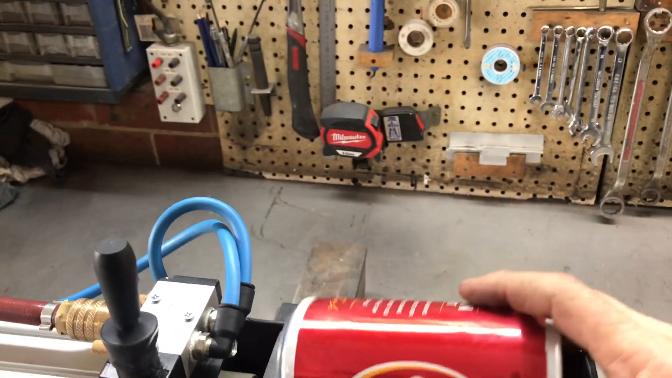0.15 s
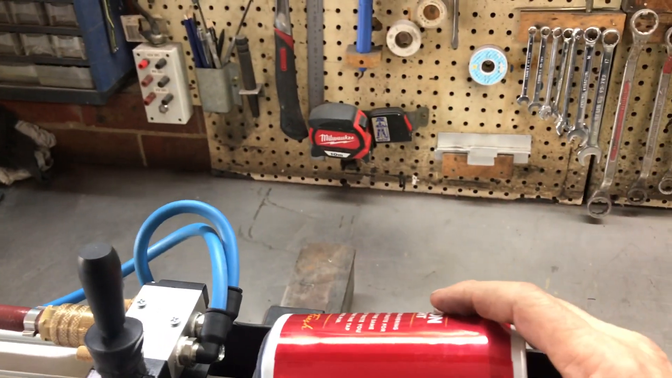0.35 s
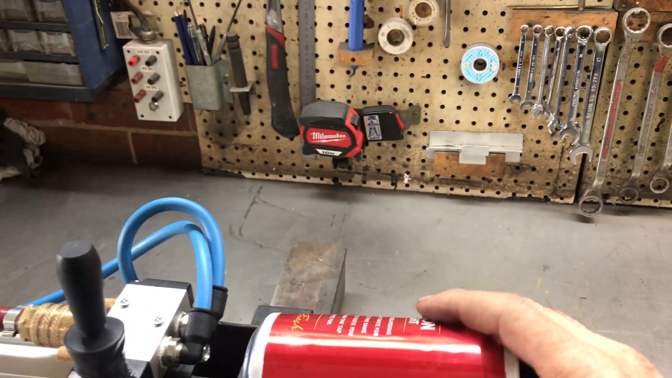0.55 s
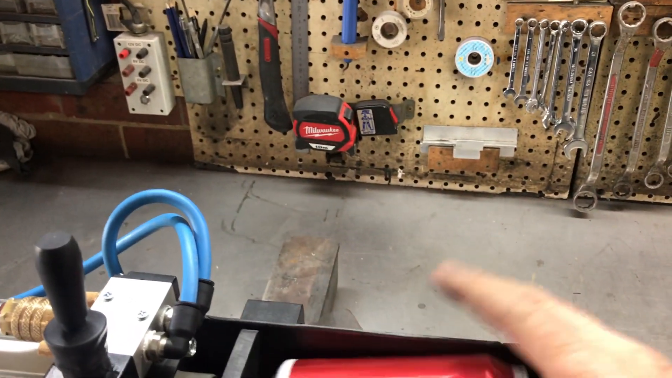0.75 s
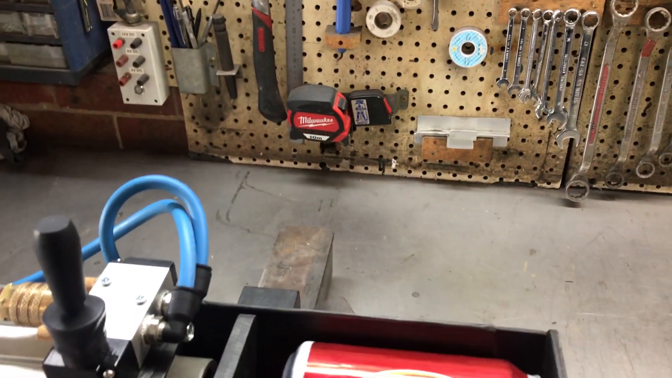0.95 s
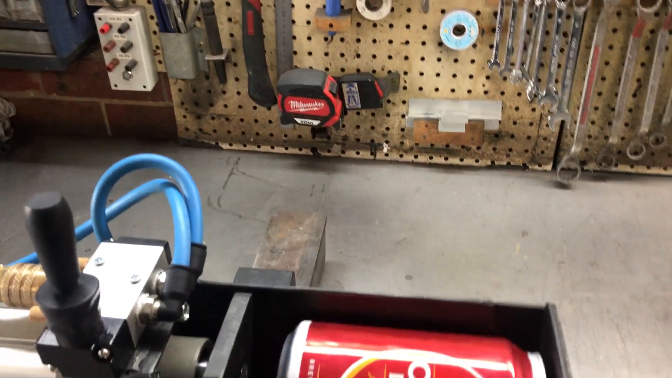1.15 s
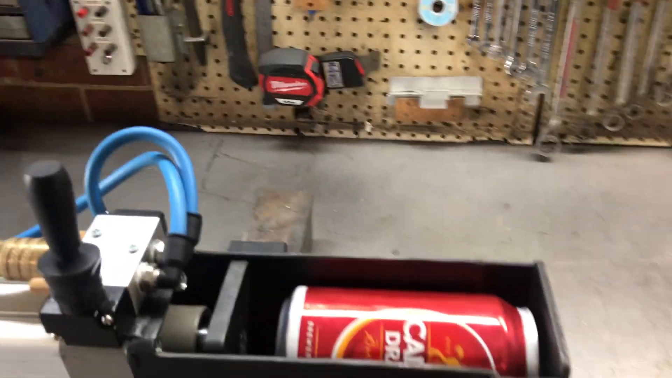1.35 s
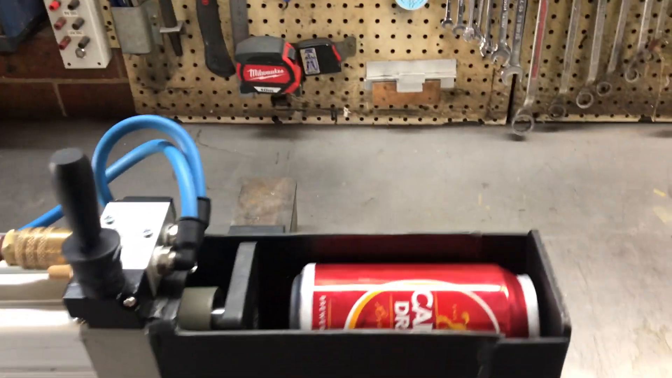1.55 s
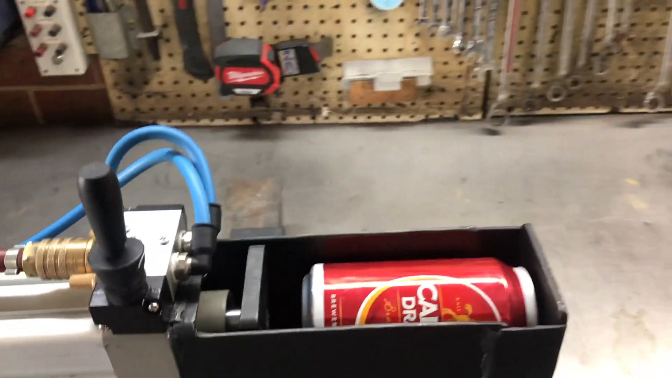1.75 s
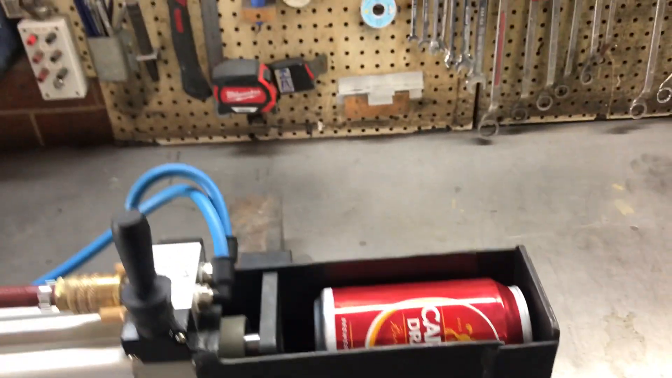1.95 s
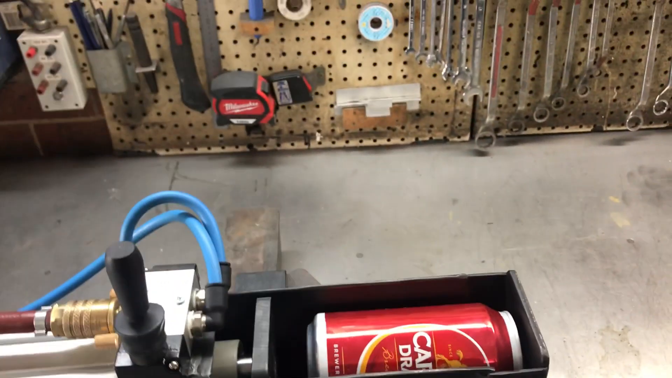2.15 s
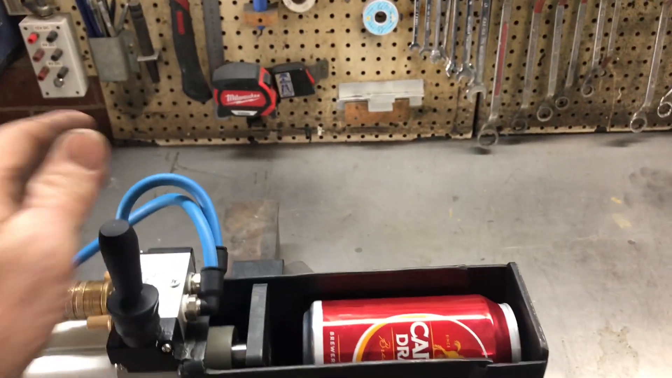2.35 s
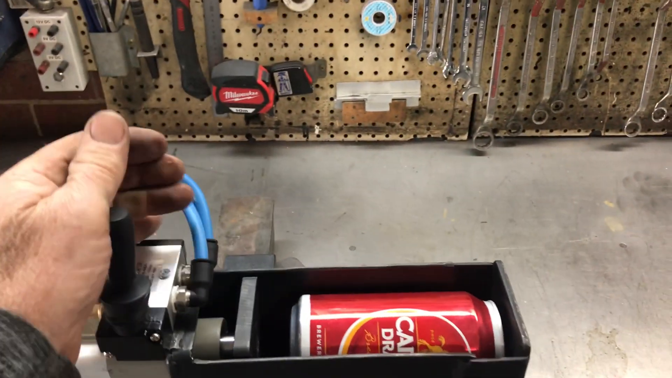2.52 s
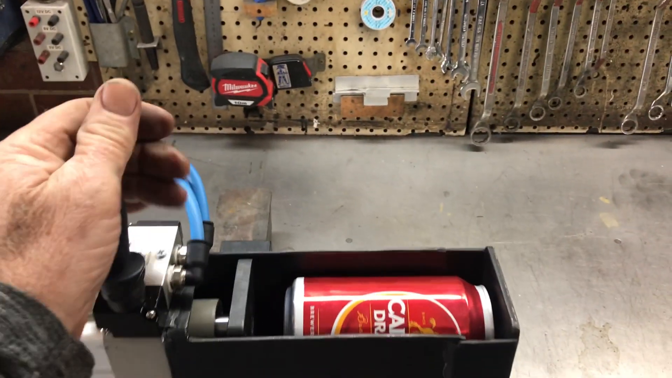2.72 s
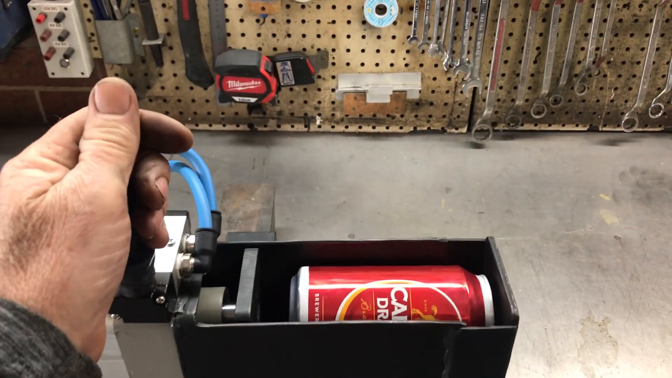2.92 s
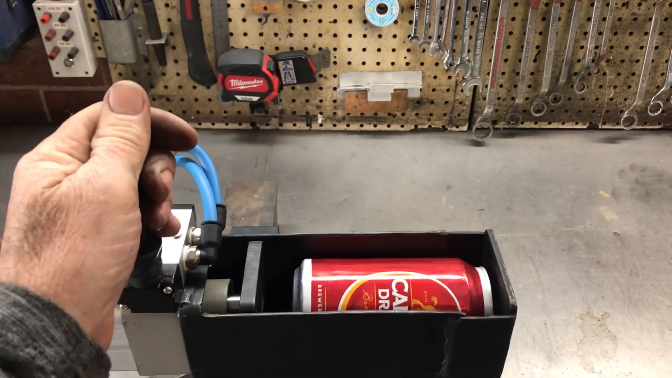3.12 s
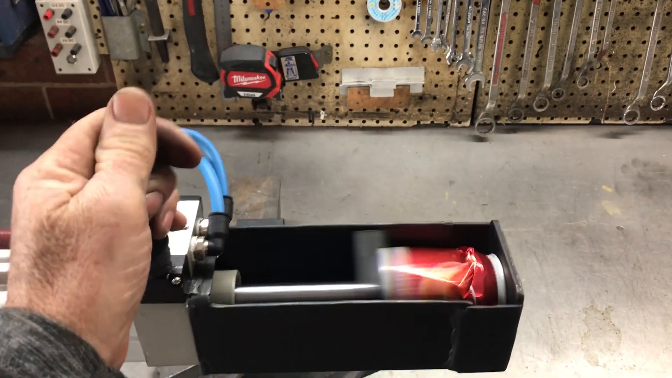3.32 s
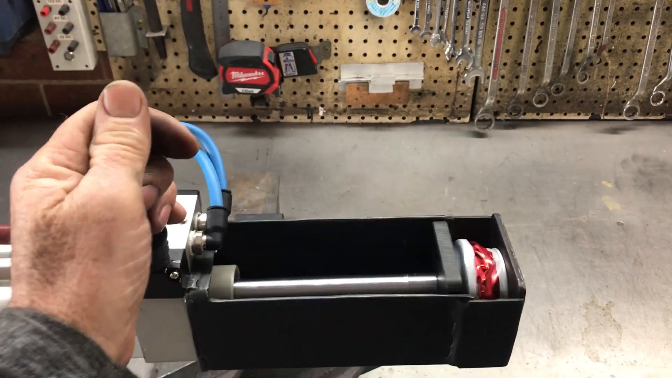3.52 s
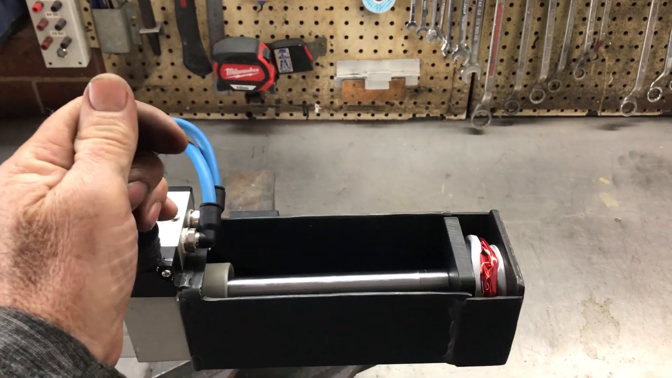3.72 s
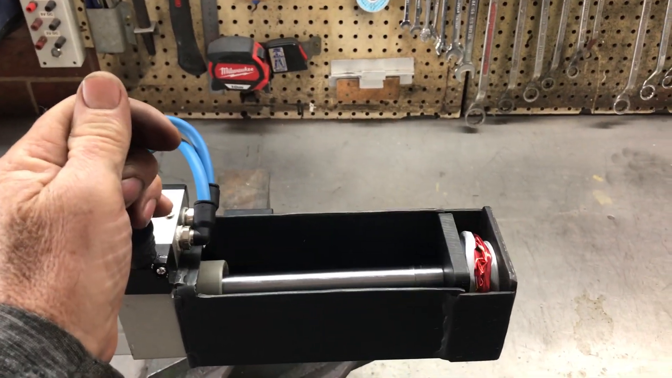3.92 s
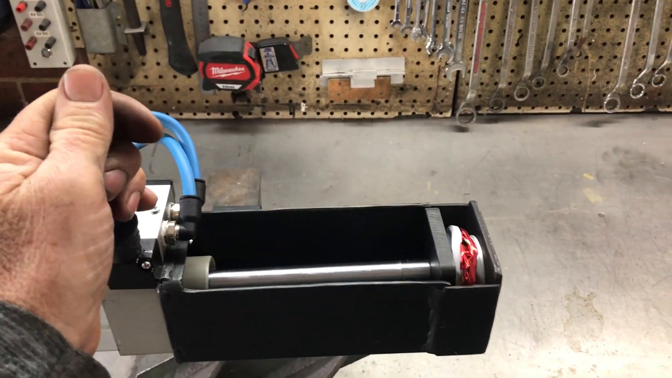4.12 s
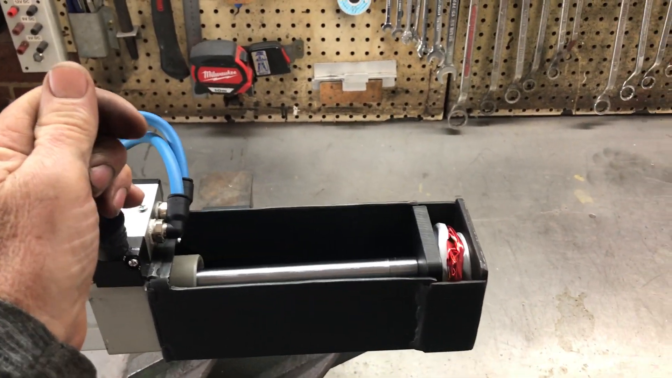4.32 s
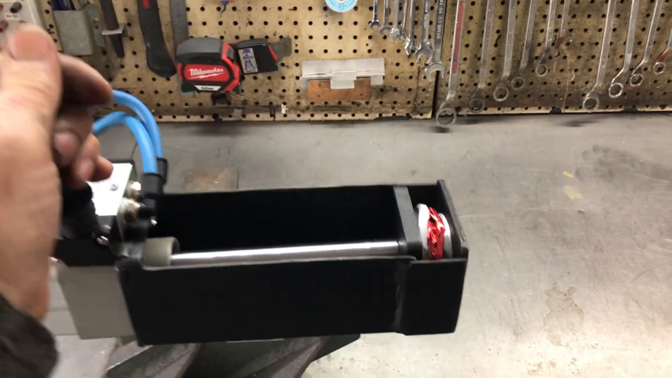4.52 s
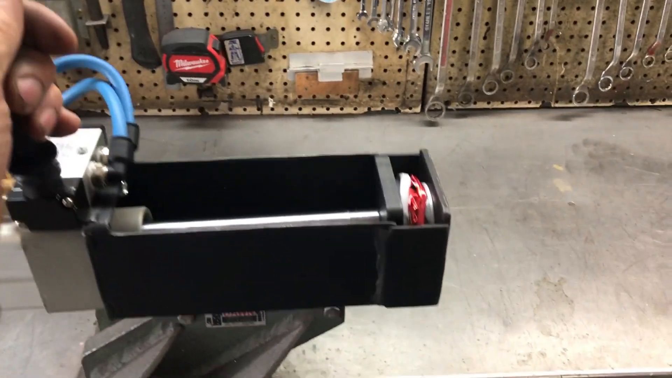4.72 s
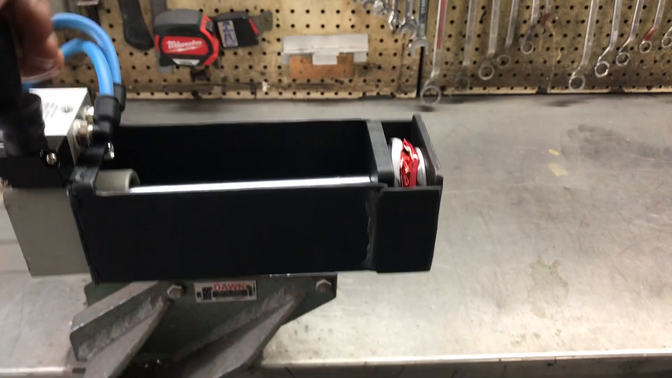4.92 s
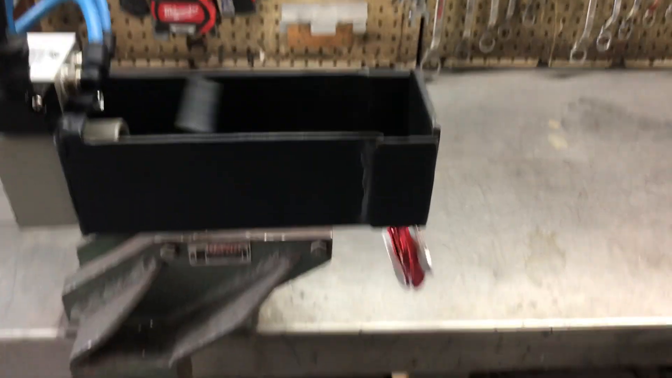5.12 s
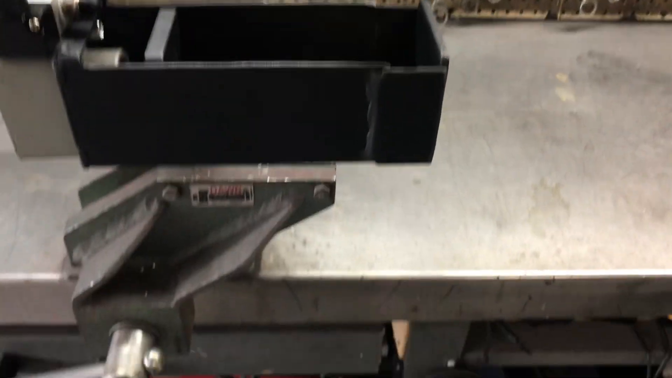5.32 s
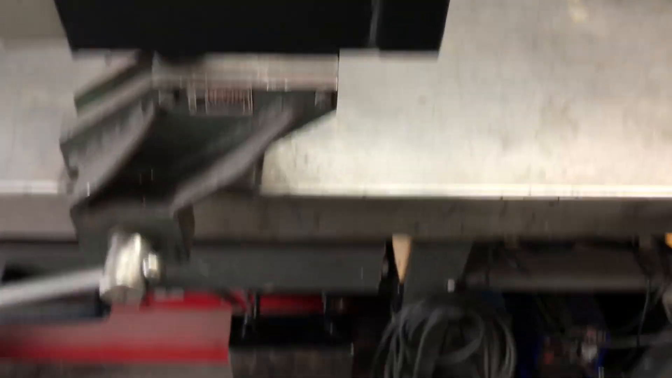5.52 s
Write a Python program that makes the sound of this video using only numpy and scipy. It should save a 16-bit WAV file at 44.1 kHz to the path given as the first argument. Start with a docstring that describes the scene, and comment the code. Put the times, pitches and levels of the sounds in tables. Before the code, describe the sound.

Close up in a small, lightly echoing workshop, an empty aluminium can knocks and clatters into a steel chute. After a near-silent pause, compressed air bursts out as the can crumples in a fraction of a second with snaps, thuds and a hard tick. A little air bleeds off, then quiet. A second, louder blast drives the ram back, followed by a whistling hiss and the flattened can landing lightly below.

```python
"""On a workshop bench, an empty aluminium can is knocked into the steel chute of an air-driven crusher.
Knocks make the can chatter and ring; light touches rustle, and sliding is a crowd of tiny clicks.
The valve opens with a blast of coloured noise, the can buckles in snaps and crackles, and ticks follow.
A second blast draws the ram rumbling back, and the flattened can drops out and lands below.
After each blast air bleeds out with a hiss and a whistle; thuds, echoes and a quiet room surround it all."""
import sys
import numpy as np
from scipy import signal
from scipy.fft import rfft, irfft, next_fast_len
from scipy.io import wavfile

SR = 44100
rng = np.random.default_rng(int(sys.argv[2]) if len(sys.argv) > 2 else 0)


def dump_mix(stems):
    """Bounce the given channels to the path in sys.argv[1] as a 16-bit WAV at rate SR."""
    frames = np.atleast_2d(stems).T  # one column per channel
    limited = np.clip(frames, -1, 1)  # hard clip at full scale
    pcm = np.round(limited * 32767).astype(np.int16)
    wavfile.write(sys.argv[1], SR, pcm)


N = 249606
TIME = np.arange(N) / SR
HIT_TIME = TIME[:SR // 2]  # every short sound gets half a second


def amp(db):
    """Turns decibels into gain."""
    return 10 ** (np.asarray(db) / 20)


def unit(x):
    """Scales a signal to rms 1."""
    return x / np.sqrt(np.mean(x ** 2) + 1e-20)


def read(points, hz):
    """Reads a curve between its points on a log-frequency axis."""
    f, value = np.transpose(points)
    return np.interp(np.log(hz + 1), np.log(f + 1), value)


def swell(rows, rise_s, fade_s):
    """Gain over time from (start s, length s, dB) rows: each rises, holds and dies away."""
    total = 0
    for start, length, db in rows:
        rise = np.clip((TIME - start) / rise_s, 0, 1)
        fade = np.exp(-np.maximum(TIME - start - length, 0) / fade_s)
        total = total + amp(db) * rise * fade
    return total


def add(mix, s, sound):
    """Mixes a sound in at time s, cutting off what runs past the end."""
    part = mix[round(s * SR):][:len(sound)]
    part += sound[:len(part)]


def band(x, lo_hz, hi_hz, order=3):
    """Keeps only the pitches between two frequencies."""
    edges = [lo_hz, min(hi_hz, SR / 2 - 1)]
    return signal.sosfilt(signal.butter(order, edges, "band", fs=SR, output="sos"), x)


def tint(x, colour):
    """Shapes a signal's spectrum by a colour curve, at rms 1."""
    size = next_fast_len(N)
    gain = amp(read(colour, np.fft.rfftfreq(size, 1 / SR)))
    return unit(irfft(rfft(x, size) * gain, size)[:N])


def noise(colour):
    """Steady noise of rms 1 with the given spectrum."""
    return tint(rng.standard_normal(N), colour)


def resonate(x, hz, width):
    """A resonance of gain 1: shift its pitch down to zero, smooth, and shift back."""
    turn = np.exp(2j * np.pi * np.cumsum(hz * np.ones(N)) / SR)
    r = np.exp(-np.pi * width / SR)
    return 2 * (turn * signal.lfilter([1 - r], [1, -r], x / turn)).real


def ring(modes):
    """A struck object sounds as a sum of dying sines, one per mode, with alternating signs."""
    total = 0
    for k, (hz, db, t60) in enumerate(modes):
        decay = amp(db - 60 * HIT_TIME / t60)
        total = total + (-1) ** k * decay * np.sin(2 * np.pi * hz * HIT_TIME)
    return total


def grains(per_s, spread_db):
    """Random tiny clicks, a few much larger than the rest."""
    size = amp(abs(spread_db) * np.minimum(rng.exponential(1, N), 4))
    sign = rng.choice([-1, 1], N)
    return unit(size * sign * (rng.random(N) < per_s / SR))


# colour of the steady background noise: [f/Hz, level/dB]
BACKGROUND_COLOUR = [(120, -30), (200, 3.5), (482, -7), (1210, -1.5), (1870, -9.5), (2250, -12),
                     (3020, -17), (3430, -14.5), (4040, -20), (6520, -20), (7680, -26.5), (15100, -24.5),
                     (16000, -36.5)]
# colour of the low rumble under it: [f/Hz, level/dB]
RUMBLE_COLOUR = [(13, -62.5), (22, -23.5), (76, 4.5), (97, -1.5), (105, -8.5), (108, -12.5), (145, -15),
                 (194, -16), (220, -29.5), (290, -45), (480, -120)]
BACKGROUND_DB, RUMBLE_DB = -64.5, -57.5


def background():
    """The quiet room is steady noise over a low rumble."""
    return amp(BACKGROUND_DB) * noise(BACKGROUND_COLOUR) + amp(RUMBLE_DB) * noise(RUMBLE_COLOUR)


# how long the room's echo takes to fall by 60 dB: [f/Hz, t/s]
ROOM_DECAY = [(200, 0.62), (1000, .52), (4000, 0.64), (9000, 0.31), (16000, 0.5)]


def workshop(x):
    """Dense reflections from bench and walls, the top treble dying sooner than the rest."""
    taps = rng.choice([-1., 1.], SR) * (rng.random(SR) < 3000 / SR)
    taps = taps * (TIME[:SR] > .004)  # the first 4 ms stay empty
    hz, t, z = signal.stft(taps, SR, nperseg=256)
    fading = z * amp(-60 * t / read(ROOM_DECAY, hz)[:, None])
    tail = signal.istft(fading, SR, nperseg=256)[1]
    return signal.fftconvolve(x, tail / np.linalg.norm(tail))[:N]


# echoes from the chute walls, bench top and tool board: [delay t/s, level/dB before echo_db]
NEAR_ECHOES = [(.0011, -17), (.0023, -14.5), (.0037, -16), (.0052, -13), (.0071, -13), (.0094, -14.5),
               (.0128, -13)]


def nearby(x, echo_db):
    """Close hard surfaces comb the sound; scaling the taps keeps it from growing louder."""
    taps = np.zeros(SR // 20)
    taps[0] = 1
    for k, (s, db) in enumerate(NEAR_ECHOES):
        taps[round(s * SR)] += (-1) ** k * amp(db + echo_db)
    return signal.oaconvolve(x, taps / np.linalg.norm(taps))[:N]


# dull thuds through the frame and bench: [t/s, level/dB, f/Hz]
BENCH_THUDS = [(.832, -40, 140), (1.03, -47, 160), (3.352, -25.5, 61), (3.356, -26.5, 175),
               (3.36, -36, 420), (3.525, -36.5, 113), (3.632, -36, 99), (3.635, -44, 280), (3.78, -29, 116),
               (3.824, -38, 89)]


def frame(thud_s, shudder_db, shudder_s):
    """The bench thuds briefly, and the frame shudders on after each thud."""
    out, t = np.zeros(N), HIT_TIME
    for s, db, hz in BENCH_THUDS:
        thud = t / thud_s * np.exp(1 - t / thud_s) * np.sin(2 * np.pi * hz * t)
        shake = unit(band(rng.standard_normal(len(t)), 84, 170))
        shudder = amp(shudder_db) * np.exp(-t / shudder_s) * shake
        add(out, s, amp(db) * (thud + shudder))
    return out


# a thin hiss as the hand takes the lever: [start t/s, length t/s, level/dB]
HISS_TIMES = [(2.43, .2, -72.5)]
# the valve sings faintly as its lever is eased back: [start t/s, length t/s, level/dB]
SINGING_TIMES = [(4.12, .1, -67), (4.52, .12, -60)]
# pitches in that singing: [f/Hz, width f/Hz, level/dB]
SINGING_MODES = [(1380, 45, -2), (1760, 30, 0), (1920, 40, -3), (2460, 60, -10), (3530, 50, -9),
                 (4680, 300, -9)]


def lever(hiss_hz):
    """Air seeps through the valve as its lever is handled: a thin hiss, later a faint singing."""
    seep = rng.standard_normal(N)
    singing = 0
    for hz, width, db in SINGING_MODES:
        singing = singing + amp(db) * unit(band(seep, hz - width / 2, hz + width / 2, order=1))
    hiss = unit(band(seep, hiss_hz / 1.06, hiss_hz * 1.06, order=2))
    sung = swell(SINGING_TIMES, rise_s=.06, fade_s=.06) * unit(singing)
    return sung + swell(HISS_TIMES, rise_s=.04, fade_s=.05) * hiss


# soft touches on the can and the valve lever: [t/s, level/dB, length t/s]
LIGHT_TOUCHES = [(0.26, -45, .006), (0.272, -45, .005), (0.304, -44, .009), (1.265, -53, 0.013),
                 (1.866, -60.5, 0.0053), (1.935, -67, .05), (2.166, -56, 0.05), (2.556, -51, .012)]
TOUCH_HZ = 3300


def touches():
    """A hand on metal makes soft taps of fading, rustling noise."""
    out, t = np.zeros(N), HIT_TIME
    for s, db, length in LIGHT_TOUCHES:
        rustle = unit(band(rng.standard_normal(len(t)), TOUCH_HZ / 1.6, TOUCH_HZ * 1.1, order=1))
        add(out, s, amp(db) * rustle * np.exp(-t / length))
    return out


# bright ticks of the valve spool and of metal settling under load:
# [t/s, level/dB, brightness f/Hz, length t/s, steel ring level/dB]
METAL_TICKS = [(3.272, -23.5, 5000, 0.0017, -39), (3.474, -19, 7940, 0.00078, -23),
               (3.624, -10.5, 4170, 0.00055, -25), (3.7608, -25.5, 14000, 0.00047, -43),
               (4.3128, -24.5, 13130, 0.00065, -33), (5.0036, -26, 4940, 0.0012, -32.5)]
# the chute struck end-on: [f/Hz, level/dB, time to fall 60 dB t/s]
CHUTE_END_MODES = [(621, -24, 0.5), (1243, -2.5, 0.43), (2420, -4, .15), (4000, -8, 0.27), (5227, -10, .25)]


def ticks(tail_db, tail_s, body_db):
    """A sudden slip gives a bright crack, a short shimmer and a faint ring of the chute."""
    out, t = np.zeros(N), HIT_TIME
    chute = ring(CHUTE_END_MODES)
    for s, db, hz, length, steel_db in METAL_TICKS:
        slip = rng.standard_normal(len(t))
        bright = unit(band(slip, hz / 1.5, hz * 1.4, order=1))
        crack = bright + amp(body_db) * unit(band(slip, 1200, 6000, order=2))
        first = np.exp(-t / length) / np.std(crack[:SR // 1000])  # evens out the first millisecond
        shimmer = amp(tail_db) * np.exp(-t / tail_s)
        add(out, s, amp(db) * (crack * (first + shimmer) + amp(steel_db) * chute))
    return out


def ram(start, slide_db, stop_s, bump_db, bump_s, ring_db):
    """The plate rumbles back along the chute, bumps into the stop and sets the steel ringing."""
    slide = swell([(start, stop_s - start, slide_db)], rise_s=.13, fade_s=.015)
    bump = swell([(stop_s, bump_s, bump_db)], rise_s=.004, fade_s=.016)
    out = (slide + bump) * unit(band(grains(per_s=3000, spread_db=4), 156, 1170, order=2))
    add(out, stop_s, amp(ring_db) * ring(CHUTE_END_MODES))
    return out


# last air bleeding out after each stroke, the second time in two waves:
# [start t/s, length t/s, level/dB, whistle level/dB against the hiss, whistle f/Hz, whistle width f/Hz,
#  hollow f/Hz, hollow level/dB against the hiss]
BLEEDS = [(3.66, .35, -58.5, -8, 8550, 530, 3850, -3), (5.25, .41, -48.3, -3.5, 9320, 430, 3340, -20),
          (5.41, .13, -49.5, -12, 9320, 430, 3340, -5)]
# colour of that hiss: [f/Hz, level/dB]
BLEED_HISS_COLOUR = [(150, -9), (480, -6), (1000, -2.5), (1500, 4.5), (2300, -0.5), (3400, 5.5), (5000, -3),
                     (7200, 0.5), (8200, -9.5), (9200, -1), (10400, -21), (14500, -7), (15900, -15),
                     (17000, -40)]


def bleed(start, length, db, whistle_db, pitch_hz, width_hz, hollow_hz, hollow_db):
    """The last air leaves as a hiss with a hollow band and a fuzzy whistle from narrow resonances."""
    jet = rng.standard_normal(N)
    narrow = resonate(resonate(jet, pitch_hz, width_hz), pitch_hz, width_hz)
    whistle = amp(whistle_db) * unit(narrow)
    hollow = amp(hollow_db) * unit(band(jet, hollow_hz / 1.13, hollow_hz * 1.13, order=2))
    level = swell([(start, length, db)], rise_s=.06, fade_s=.11)
    return level * (noise(BLEED_HISS_COLOUR) + whistle + hollow)


CRACK_OPEN_S, CRACK_OPEN_DB, SURGE_DB = .006, -24, -12  # the flow jumps on, then climbs to a surge
# decay times: surge to running level, flow at the end of travel, leftover air
SETTLE_S, CHOKE_S, EMPTY_S = .055, .0205, .16


def flow(start, open_s, travel_s, run_db, leftover_db):
    """The air surges as the valve opens, settles while the ram travels, and chokes off when it stops."""
    t = TIME - start
    opening_db = np.interp(t, [0, open_s], [CRACK_OPEN_DB - SURGE_DB, 0])
    pressure_db = run_db + (SURGE_DB - run_db) * np.exp(-np.maximum(t - open_s, 0) / SETTLE_S)
    moving = amp(opening_db + pressure_db) * swell([(start, travel_s, 0)], CRACK_OPEN_S, CHOKE_S)
    leftover = swell([(start, travel_s, leftover_db)], CRACK_OPEN_S, EMPTY_S)
    return np.hypot(moving, leftover)


# forward and return stroke, one row each: [valve opens t/s, opening takes t/s, travel t/s,
#  running level/dB, leftover air level/dB, valve resonance level/dB]
PUSH_STROKE = (3.271, .047, .208, -25.3, -41, -13.5)
PULL_STROKE = (5.0, .06, .241, -17.5, -52, -4.5)
# colour of the air in each stroke: [f/Hz, level/dB]
PUSH_AIR_COLOUR = [(59, -38.5), (100, -6.5), (202, -19.5), (302, -19), (461, -22), (854, -16.5),
                   (1360, -13), (1520, -8), (2580, -4), (4200, -2.5), (4870, -10.5), (7140, -7),
                   (10200, -13), (14400, -9), (16000, -12)]
PULL_AIR_COLOUR = [(59, -51), (100, -13), (322, -23), (415, -11), (492, -15.5), (1080, -8), (1450, -2.5),
                   (2220, -4.5), (2750, -2), (2990, -3), (3620, -2.5), (4980, -8), (9410, -5),
                   (15000, -6.5), (16000, -22.5)]
# valve resonances: [f/Hz, width f/Hz, level/dB]
VALVE_PORTS = [(1525, 40, -2.5), (1635, 60, -5), (2450, 140, -7), (2813, 35, 0), (3270, 50, 4.5),
               (3635, 23, -0.5), (8700, 300, 5), (9450, 300, -3)]


def exhaust(stroke, colour, flutter):
    """A turbulent jet leaves the valve, coloured by the resonances of its ports."""
    *motion, port_db = stroke
    jet = noise(colour)
    ports = 0
    for hz, width, db in VALVE_PORTS:
        ports = ports + amp(db) * signal.lfilter(*signal.iirpeak(hz, hz / width, SR), jet)
    gusts = unit(band(rng.standard_normal(N), 20, 300, order=1))
    return flow(*motion) * unit(jet + amp(port_db) * ports) * np.exp(flutter * gusts)


# ways the can rings: [f/Hz, level/dB, time to fall 60 dB t/s]
CAN_MODES = [(329.4, -7, 0.48), (609, -10.5, 0.57), (830, -10, 0.14), (938, 4, .1), (1010, -7, .055),
             (1185, -9, .1), (1320, -8.5, 0.19), (1504, -0.5, .06), (1504, -7.5, .05), (1726, 3.5, .07),
             (1846, -12.5, .14), (2060, -6, .14), (2700, -12.5, 0.13), (2906, -4, .12), (2980, -6, .1),
             (3590, -8, 0.19), (3747, -9.5, .13), (3980, -11, 0.35), (8300, -11.5, .06), (11756, -26, .04)]


def crackle(level, colour, per_s, spread_db, ring_db):
    """Many small slips or creases, each ringing the can a little."""
    clicks = grains(per_s, spread_db)
    ringing = unit(band(signal.oaconvolve(clicks, ring(CAN_MODES))[:N], 810, 12000))
    return level * unit(tint(clicks, colour) + amp(ring_db) * ringing)


# can sliding on steel: [start t/s, length t/s, level/dB]
SLIDES = [(.045, .06, -57), (.28, .38, -64), (.68, .19, -42), (1.04, .11, -46)]
# colour of the sliding: [f/Hz, level/dB]
SLIDING_COLOUR = [(120, -50), (200, -23.5), (322, -15), (491, -25), (791, -3.5), (1250, -4), (1420, -15.5),
                  (1620, -18.5), (2510, -23.5), (3130, -19), (4950, -31.5), (8420, -23.5), (16000, -40)]


def scrapes():
    """The can slides on steel in many small slips."""
    level = swell(SLIDES, rise_s=.04, fade_s=.045)
    return crackle(level, SLIDING_COLOUR, per_s=2600, spread_db=3, ring_db=-13)


# the wall gives way in two collapses: [start t/s, length t/s, level/dB]
WALL_COLLAPSES = [(3.349, .03, -13.3), (3.428, .048, -21)]
# colour of the crumpling: [f/Hz, level/dB]
CRUMPLING_COLOUR = [(59, -38), (100, -6.5), (502, -23), (1010, -7), (1310, -8), (2470, 4), (2690, -7),
                    (2860, -8.5), (4870, -4.5), (5650, -4.5), (7770, -17.5), (13500, -8.5), (16000, -24)]


def collapses():
    """The can wall creases in two short, dense bursts of clicks."""
    level = swell(WALL_COLLAPSES, rise_s=.005, fade_s=.012)
    return crackle(level, CRUMPLING_COLOUR, per_s=1900, spread_db=6.5, ring_db=-12)


# ways the steel chute rings: [f/Hz, level/dB, time to fall 60 dB t/s]
STEEL_MODES = [(608, -17.5, 0.91), (900, -18, 0.47), (1239, 6, 0.29), (1620, -16, 0.19), (2610, -19.5, .2),
               (3198, -10.5, 0.24), (4043, -14, 0.26)]
# the can lies in the chute between these two times, which damps the steel: [from t/s, to t/s]
CAN_IN_CHUTE = (.3, 5.3)
BARE_STEEL_DB, DAMPED_STEEL_DB = -11, -30
HELD_UNTIL_S, HAND_DAMPING_DB = .75, -6  # the hand mutes the can's own ring until it lets go


def blows(rows, wall_hz, tick_db, chatter_s, free_db, dent_db, dent_s, rim_db, rim_s, sheet_db, dense_s,
          tick_s, trim_db):
    """Each contact flexes the can wall, chatters briefly, and rings the can and the steel chute."""
    out, t = np.zeros(N), HIT_TIME
    can, steel = ring(CAN_MODES), ring(STEEL_MODES)
    for s, db, hz, edge_db, boom_db in rows:
        in_chute = CAN_IN_CHUTE[0] < s < CAN_IN_CHUTE[1]
        steel_db = DAMPED_STEEL_DB if in_chute else BARE_STEEL_DB
        rattle, sheet = rng.standard_normal((2, len(t)))
        chatter = rattle * np.exp(-t / chatter_s)
        shimmer = amp(sheet_db) * sheet * np.exp(-t / dense_s)  # thin metal has countless short modes
        body = amp(free_db + HAND_DAMPING_DB * (s < HELD_UNTIL_S)) * can + chatter + shimmer

        # the struck panel swings a few times, and the stiff rim pings
        swing = np.sin(2 * np.pi * hz * t) + 0.17 * np.sin(2 * np.pi * 1.65 * hz * t)
        dent = band(amp(dent_db) * np.exp(-t / dent_s) * swing, 720, 2600, order=3)
        rim = amp(rim_db + edge_db) * np.exp(-t / rim_s) * np.sin(2 * np.pi * wall_hz * t)

        clunk = band(band(body, 670, 1950, order=4), hz / np.sqrt(2), hz * np.sqrt(2), order=1)
        boom = band(body, 230, 380, order=2)
        wall = band(band(body, 2700, 5000, order=3), wall_hz / 1.12, wall_hz * 1.115, order=1)
        sharp = rattle * np.exp(-t / tick_s) + .3 * chatter + 0.35 * shimmer
        tick = band(band(sharp, 4200, 9500, order=1), 4800, 19000)
        hard_tick_db = tick_db + .4 * edge_db  # a harder contact also ticks more

        sound = 0
        for level, part in [(0, clunk), (boom_db, boom), (edge_db, wall), (hard_tick_db, tick)]:
            sound = sound + amp(level) * part / np.std(part[:SR // 100])  # equal over the first 10 ms
        add(out, s, amp(db + trim_db) * (sound + dent + rim + amp(steel_db) * steel))
    return out


# after a hard drop the other end of the can lands too: weaker, higher and more on the rim;
# the weaker the knock, the smaller its share
HARD_DROP_DB = -11
REBOUND_S, REBOUND_DB, REBOUND_DB_PER_DB = .0062, 7.5, 2.7
REBOUND_PITCH, REBOUND_EDGE_DB = 1.62, 9  # pitch ratio, extra rim


def rebounds(rows):
    """The other end of the can makes a second contact just after each hard drop."""
    return [(s + REBOUND_S, REBOUND_DB + REBOUND_DB_PER_DB * db, hz * REBOUND_PITCH,
             edge_db + REBOUND_EDGE_DB, boom_db)
            for s, db, hz, edge_db, boom_db in rows if db > HARD_DROP_DB]


# the can hitting steel: [t/s, level/dB before the trim, clunk f/Hz,
#  edge level/dB (how much the hard rim takes the blow), hollow boom level/dB]
CAN_KNOCKS = [(.2129, -14.8, 900, -8, -27), (.3727, -18.5, 780, -14.5, -24), (.4318, -23, 750, -18, -8),
              (.5395, -36, 762, -22, -11), (.7045, -28, 770, -16, -18), (.7345, -23.5, 770, -16, -23),
              (.7902, -6.7, 1080, -10, -33), (.817, -20, 1810, -4, -25), (.832, -19, 1400, 2, -7),
              (.8515, -17, 1300, -20, -25), (.9648, -27, 1150, 2, -4), (1.0297, -8.3, 1050, -19, -31),
              (1.0713, -13, 1020, -14, -38), (1.1195, -22, 1080, -11, -30), (1.1545, -29, 980, -10, -16),
              (5.6345, -22.5, 1400, -2.5, -11)]


def knocks():
    """The can hits steel, with a swinging panel, a pinging rim and a ringing body."""
    return blows(CAN_KNOCKS + rebounds(CAN_KNOCKS), wall_hz=3250, tick_db=-9.5, chatter_s=.01,
                 free_db=-13.5, dent_db=13.5, dent_s=0.0027, rim_db=5, rim_s=0.006,
                 sheet_db=-15, dense_s=0.02, tick_s=.001, trim_db=-10)


# folds snapping in the can wall: [t/s, level/dB before the trim, clunk f/Hz]
FOLD_SNAPS = [(3.351, -9.7, 900), (3.37, -10.7, 960), (3.375, -12, 2080), (3.416, -20, 800),
              (3.432, -15, 800), (3.442, -20, 1940), (3.457, -18, 1780), (3.466, -22, 1710),
              (3.523, -32, 2190)]
SNAP_EDGE_DB, SNAP_BOOM_DB = 1.5, -24


def folds():
    """Folds snap in the can wall like short knocks with very little ring."""
    rows = [(s, db, hz, SNAP_EDGE_DB, SNAP_BOOM_DB) for s, db, hz in FOLD_SNAPS]
    return blows(rows, wall_hz=2900, tick_db=-7, chatter_s=.002, free_db=-25, dent_db=8, dent_s=.003,
                 rim_db=-2.5, rim_s=.003, sheet_db=-13.5, dense_s=.008, tick_s=.0006, trim_db=-10)


def scene():
    """Can, ram and air, close by in a small workshop."""
    can = knocks() + touches() + scrapes()
    crush = folds() + collapses()
    settling = ticks(tail_db=-13, tail_s=0.01, body_db=-14)
    air = exhaust(PUSH_STROKE, PUSH_AIR_COLOUR, flutter=.08)
    air += exhaust(PULL_STROKE, PULL_AIR_COLOUR, flutter=0.077)
    air += sum(bleed(*row) for row in BLEEDS) + lever(hiss_hz=6600)
    air = nearby(air, echo_db=0)
    ram_back = ram(PULL_STROKE[0], slide_db=-37, stop_s=5.215, bump_db=-27, bump_s=.009, ring_db=-40)
    metal = nearby(can + crush, echo_db=-6.5) + settling + ram_back
    room = workshop(amp(-17) * (can + crush) + amp(-12.5) * settling + amp(-20) * air)
    bench = frame(thud_s=.01, shudder_db=-11, shudder_s=.09)
    return (metal + air + bench + room + background())[None]


def record(dry):
    """Rounds off the loudest peaks, then removes the treble above the band limit."""
    ceiling, edge_hz = .72, 15900
    rounded = dry / (1 + (dry / ceiling) ** 6) ** (1 / 6)
    lowpass = signal.firwin(511, edge_hz, window=("kaiser", 9), fs=SR)
    return signal.oaconvolve(rounded, lowpass[None], "same")


dry = scene()
out = record(dry)
dump_mix(out)
```